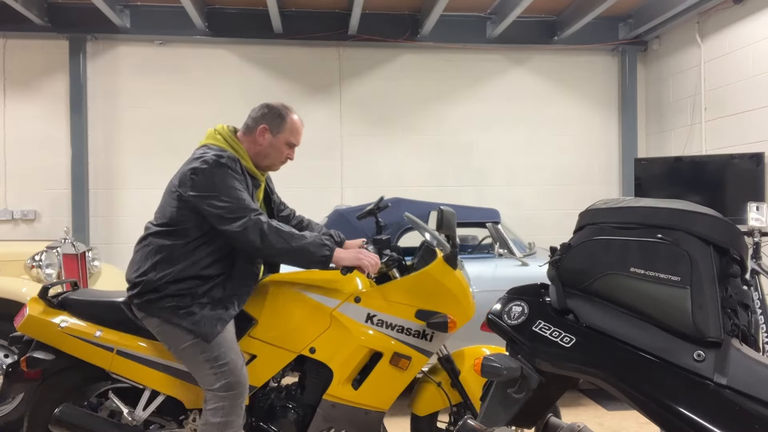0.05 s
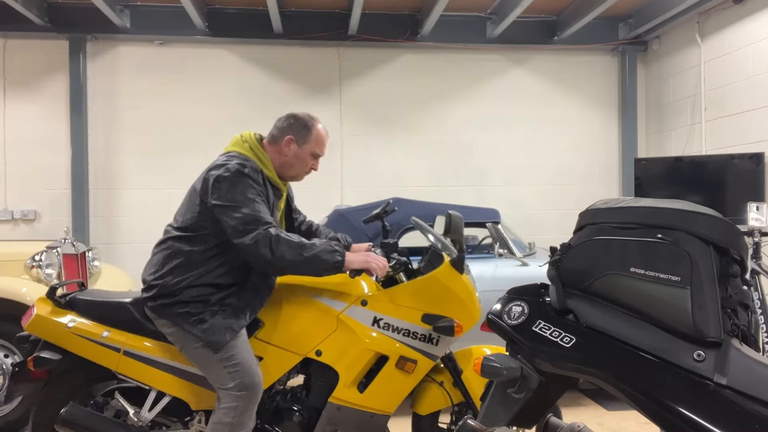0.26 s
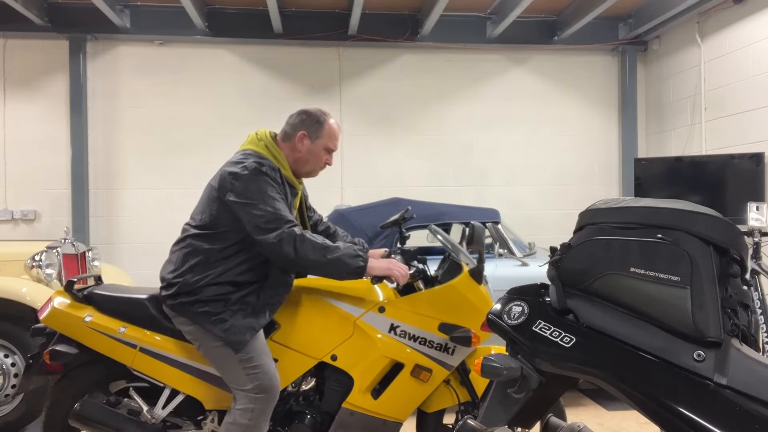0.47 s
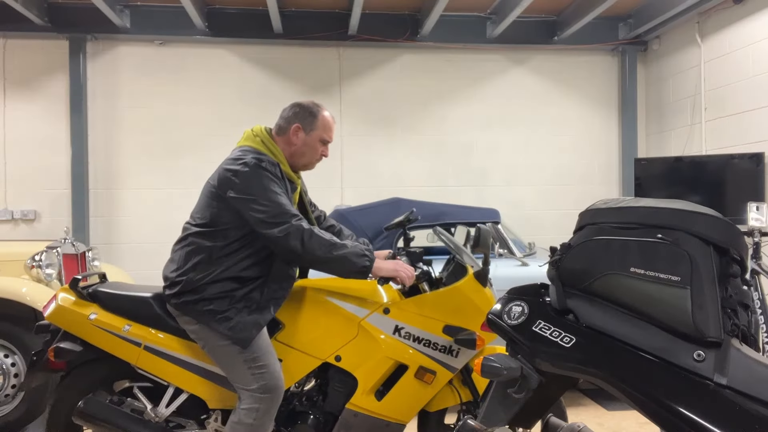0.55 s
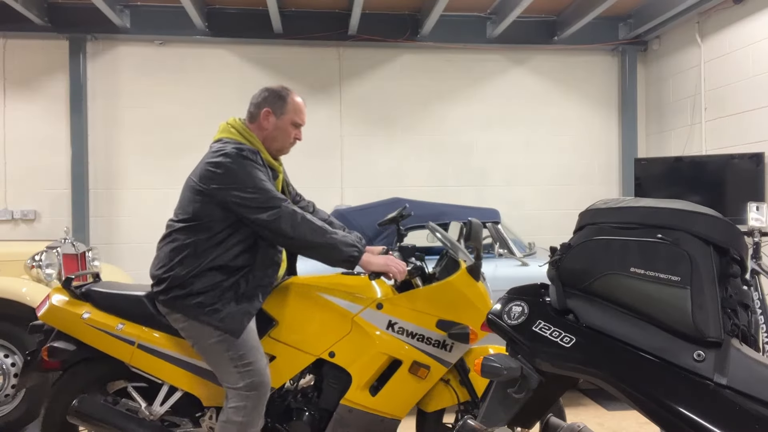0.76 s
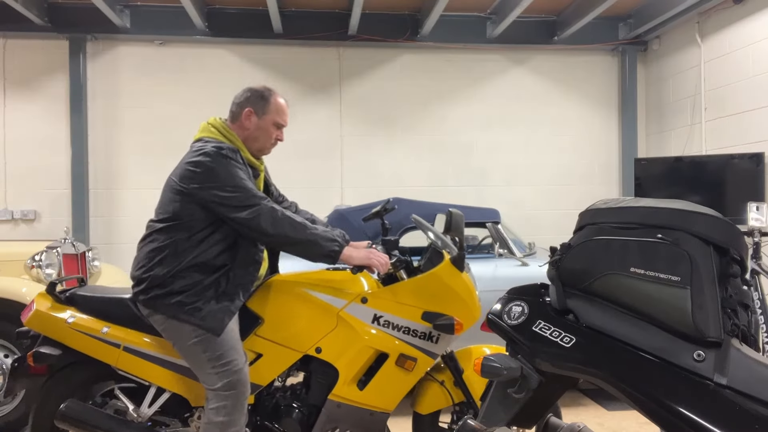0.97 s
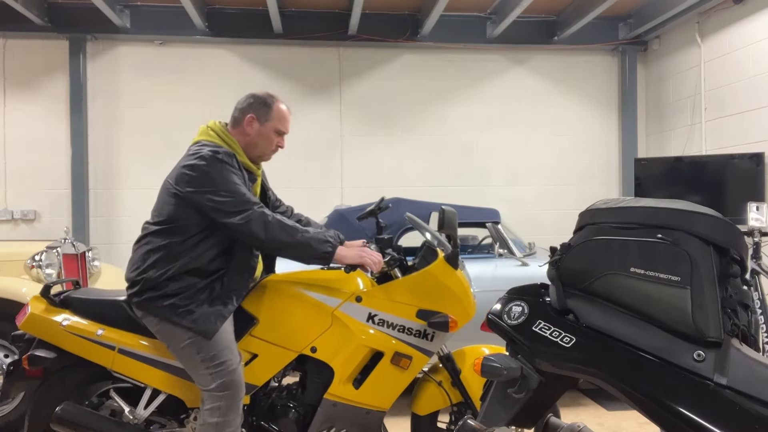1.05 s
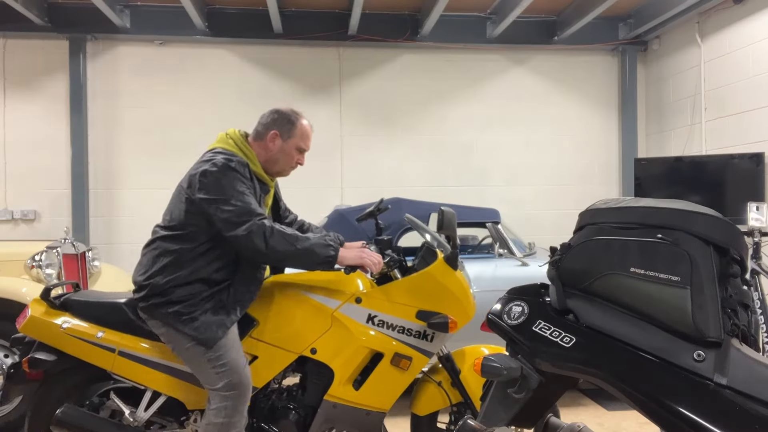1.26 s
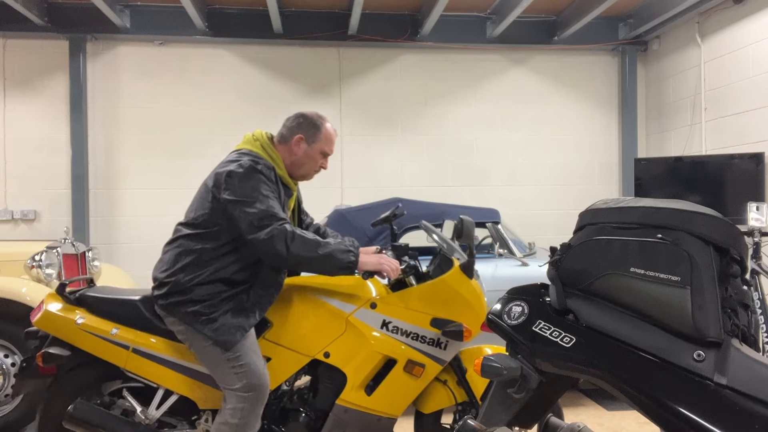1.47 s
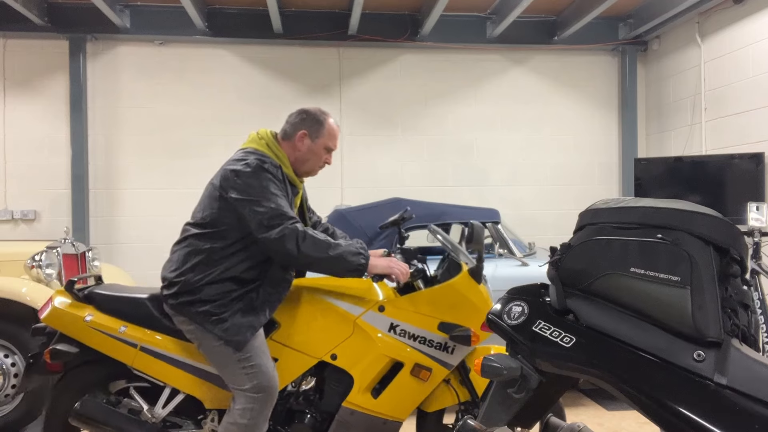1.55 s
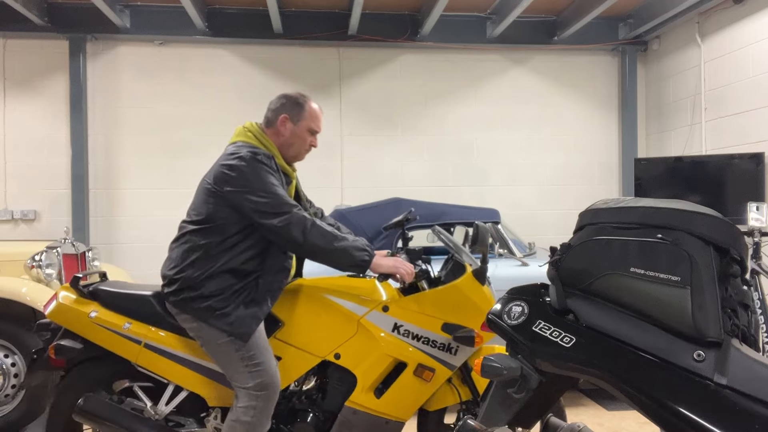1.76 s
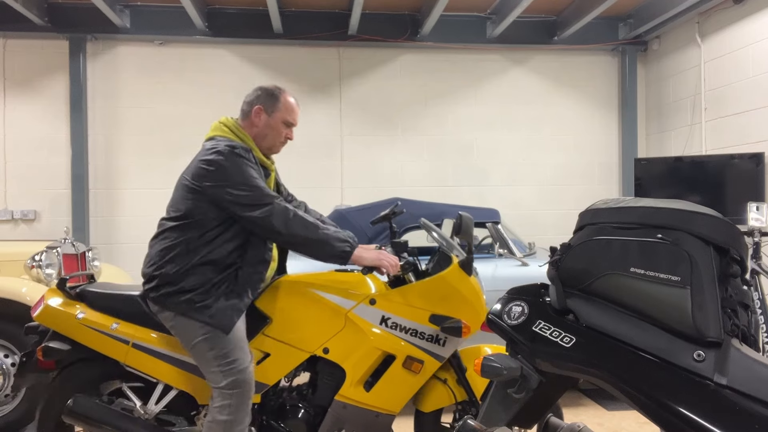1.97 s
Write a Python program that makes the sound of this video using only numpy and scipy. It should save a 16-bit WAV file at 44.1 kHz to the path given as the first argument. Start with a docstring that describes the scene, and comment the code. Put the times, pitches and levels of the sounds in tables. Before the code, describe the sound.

Fuel sloshing in a rocked motorcycle's hollow tank. Faint at first, then a sharp, bright knock with a low thud at 0.25 seconds. Seat scuffs and a crisp crease snap follow; rapid round glugs cluster around 0.45-0.6 with nylon swishing to 0.9. A near-quiet lull, a softer dull knock at 1.34, then gentler gurgles and brief rustle at 1.5-1.8, fading in a short garage echo.

```python
"""In a garage, a rider in a nylon jacket rocks a parked motorcycle to and fro.
The jacket swishes and cloth scuffs on the seat: both are random clicks shaped into coloured noise.
Creases snap as short noise bursts, and taut folds whistle as narrow bands of noise.
Fuel gurgles in the hollow tank: random laps ring its air, and single glugs are rising tones.
A loose part knocks twice and the weight thuds into the suspension, both as dying tones."""
import sys
import numpy as np
from scipy import signal
from scipy.io import wavfile

SR = 44100
rng = np.random.default_rng(int(sys.argv[2]) if len(sys.argv) > 2 else 0)


def generate_wav(sig):
    """Save sig (samples, or channels by samples) to the path in sys.argv[1] as 16-bit PCM at SR."""
    pcm = np.round(np.clip(np.atleast_2d(sig).T, -1, 1) * 32767).astype(np.int16)
    wavfile.write(sys.argv[1], SR, pcm)


def gain_from_decibels(decibels):
    """Convert decibel values to linear amplitude factors."""
    exponent = np.asarray(decibels, float) / 20
    return 10 ** exponent


N = 88200
TIME = np.arange(N) / SR   # s

# still air, relative spectrum: pitch_hz, level_db
AIR_SPECTRUM = [(35, -48.5), (60, -12), (367, 6), (846, -21.5), (1070, -8.5), (1550, -16), (1860, -12),
                (2240, -27.5), (3830, -18.5), (4500, -31), (8620, -21.5), (15400, -36.5)]
AIR_DB = -76.5

# garage reflections
ROOM_T60_S, ROOM_DB, WALL_CUT_HZ = 0.22, -17.5, 2500

# thuds into the suspension: start_s, level_db (before THUD_DB)
THUDS = [(.251, -24), (0.328, -30.5), (0.722, -48), (0.834, -30.5), (1.348, -25), (1.822, -40)]
# ringing tones of the frame: pitch_hz, level_db (relative), t60_s
FRAME_TONES = [(66.7, -2, 0.33), (97.2, 7, 0.067), (46, -19, 0.16)]
THUD_DB, THUD_RISE_S = -19.5, 0.008

# knocks of the loose part: start_s, tick_db, body_db, body_time_scale (a factor), side_tones_db
KNOCKS = [(0.2491, -20, -17, 0.24, -1.7), (1.337, -45.5, -24.5, 0.59, -9)]
# bright tick of a knock: pitch_hz, level_db (relative), t60_s
TICK_TONES = [(1088, -6, 0.023), (3170, -8, 0.0086), (4470, -13, .01), (6600, 0, .012), (7380, -11, 0.028),
              (8450, -43.5, .01), (12240, -22, 0.017)]
# hollow body of a knock: pitch_hz, level_db (relative), t60_s (before body_time_scale)
BODY_TONES = [(372, -1.5, 0.18), (310, -14.5, 0.16), (250, -2.5, 0.054), (165, -20, 0.24),
              (720, -10.5, 0.059), (1090, -8.5, 0.054)]
SIDE_TICK_HZ = 8200   # tick tones above this also take side_tones_db
BODY_LAG_S, BODY_RISE_S = 0.0024, 0.0018   # the rise is before body_time_scale
CRACK_DB, CRACK_T60_S = -12.5, 0.024

# sparse crinkles mixed into the slips of jacket and seat
CRINKLES_PER_S, CRINKLE_SPREAD_DB, CRINKLE_DB = 300, 3.5, -10.0

# cloth scuffing on the seat: start_s, level_db (before SCUFF_DB)
SCUFF = [(0.0, -60.5), (0.034, -71.5), (0.162, -54), (0.188, -44), (0.238, -50.5), (0.27, -46.5),
         (0.304, -36), (0.354, -54.5), (0.384, -48), (0.51, -58.5), (0.524, -51.5), (0.554, -55.5),
         (0.58, -47.5), (0.728, -53.5), (0.81, -48), (0.974, -67), (1.088, -55.5), (1.294, -85),
         (1.325, -72.5), (1.36, -55.5), (1.368, -65), (1.5, -79.5), (1.522, -106), (1.562, -83.5),
         (1.632, -73), (1.662, -55), (1.702, -51), (1.73, -70), (1.79, -73), (1.862, -102), (1.97, -89.5),
         (2.0, -90)]
# colour of the scuff, relative spectrum: pitch_hz, level_db
SEAT_SPECTRUM = [(290, -41.5), (500, -6), (593, -12.5), (809, -13.5), (1030, -13), (1180, -10),
                 (1680, -15.5), (1840, -10), (2370, -15.5), (3870, -21.5), (4970, -42.5), (5500, -40.5),
                 (7150, -49), (12100, -120)]
# narrow resonances of the rubbed panels: pitch_hz, width_hz, level_db (relative to the scuff)
PANELS = [(1043, 47, -9), (1334, 210, -20), (1776, 27, -16.5), (2170, 72, -27.5), (2804, 90, -18),
          (3340, 100, -29.5), (4600, 120, -17), (8150, 200, -32)]
SEAT_GRAINS_PER_S, SEAT_GRAIN_SPREAD_DB, SCUFF_DB = 4000, 2.5, -2.5
RUMBLE_DB, RUMBLE_TOP_HZ = -24.5, 150   # level relative to the scuff

# sharp folds snapping: start_s, level_db (before SNAP_DB and the band filter)
SNAPS = [(0.2902, -18), (0.3014, -31), (0.4603, -30), (0.5437, -41), (0.808, -26), (1.3948, -40.5)]
SNAP_T60_S, SNAP_DB, SNAP_LOW_HZ, SNAP_HIGH_HZ = 0.0061, -13.5, 900, 8000

# nylon sliding on nylon: start_s, level_db, sheen_db (finest slips, relative to level_db)
SWISH = [(0.0, -77.5, -35), (0.08, -70.5, -22), (0.108, -63, -38), (0.196, -57.5, -9), (0.238, -76, 9),
         (0.268, -54.5, -3), (0.29, -57, 3), (0.326, -54.5, -5), (0.356, -64.5, -4.5), (0.426, -55.5, -5),
         (0.508, -52.5, -6.5), (0.538, -57, 8), (0.544, -44.5, -9), (0.608, -54.5, -1), (0.722, -62, -11),
         (0.812, -51, -5), (0.822, -59, -1), (0.906, -65, -11), (1.046, -72, -27), (1.068, -66, -31),
         (1.15, -73.5, -11), (1.272, -100.5, -17), (1.325, -87, -13), (1.348, -67, -34),
         (1.406, -75.5, -10), (1.52, -103, 13), (1.572, -89, 1), (1.62, -53, -3.5), (1.658, -57.5, 1),
         (1.89, -103, -1.5), (1.994, -103, 0.5), (2.0, -104, -17)]
# colour of the nylon, relative spectrum: pitch_hz, level_db
NYLON_SPECTRUM = [(1710, -39.5), (2900, -2.5), (3080, -7.5), (3360, 2.5), (3800, 7.5), (4710, 1.5),
                  (5030, -27.5), (5430, 1), (6590, 4), (7150, 4), (7750, -4), (9030, -8.5), (9800, -34),
                  (12700, -39.5), (21600, -120)]
# colour of the finest slips, relative spectrum: pitch_hz, level_db
SHEEN_SPECTRUM = [(5290, -17.5), (9000, -9), (9850, -18.5), (11900, -13), (12900, -4), (13800, -16),
                  (14700, -10.5), (15400, -6.5)]
NYLON_GRAINS_PER_S, NYLON_GRAIN_SPREAD_DB = 9000, 2.5
# short whistles of a taut fold: start_s, level_db (before WHISTLE_DB), pitch_hz, rise_s
WHISTLES = [(0.108, -45.5, 4600, 0.0076), (0.413, -36, 2750, 0.0077), (.543, -30, 7210, 0.0032),
            (.565, -34, 6600, 0.0083), (0.805, -40.5, 5200, 0.0077), (1.393, -52, 3700, 0.0041),
            (1.606, -46.5, 3930, 0.015), (1.619, -39, 3830, 0.0035), (1.61, -48.5, 7100, 0.023)]
WHISTLE_WIDTH_HZ, WHISTLE_DB = 180, -14

# fuel moving in the tank: start_s, level_db (before SLOSH_DB), cavity_pitch_hz
SLOSH = [(0.0, -54.5, 460), (0.148, -54, 454), (0.19, -43.5, 437), (0.23, -45, 470), (0.238, -51.5, 463),
         (0.285, -41.5, 473), (0.363, -43, 384), (0.403, -35, 364), (0.501, -57, 440), (0.583, -39.5, 350),
         (0.605, -48.5, 344), (0.695, -46, 363), (0.751, -56.5, 400), (0.855, -44.5, 387),
         (1.003, -69, 466), (1.049, -52.5, 370), (1.107, -66.5, 400), (1.177, -62.5, 420),
         (1.243, -72, 352.6), (1.315, -99.5, 325), (1.325, -69, 344), (1.39, -56, 357), (1.408, -69, 357),
         (1.428, -50.5, 354), (1.466, -53, 355), (1.584, -45, 361), (1.65, -46.5, 359), (1.718, -41, 367),
         (1.77, -49.5, 375), (1.798, -45, 352), (1.848, -70, 353), (1.882, -69.5, 465), (1.894, -85, 468),
         (1.928, -79, 348), (1.974, -50, 369), (2.0, -54, 369)]
# fixed side resonances of the tank: pitch_hz, width_hz (of one pass), level_db (relative to the cavity)
TANK = [(310, 78.5, -5.5), (524.6, 24, -12), (692.7, 66, -18), (185, 40, -20)]
LAPS_PER_S, LAP_SPREAD_DB, CAVITY_WIDTH_HZ, SLOSH_DB = 260, 1, 111, -2.0
# single glugs: start_s, level_db (before GLUG_DB), starting_pitch_hz, t60_s
GLUGS = [(0.438, -24, 367.6, 0.075), (.469, -15, 474, 0.038), (.482, -25.5, 360, 0.11),
         (.494, -20, 448, 0.06), (.502, -20, 493, 0.049), (.512, -24, 358.5, 0.078),
         (.519, -33.5, 636, 0.059), (.537, -21, 372, 0.045), (.604, -27.5, 349, 0.1),
         (0.64, -31, 349.4, 0.12), (.678, -32.5, 422, 0.059), (.794, -40, 328, 0.1), (.84, -35, 365, 0.095),
         (0.872, -29, 387, 0.047), (1.033, -46, 395, .05), (1.423, -49, 359, 0.078),
         (1.528, -33, 364.6, 0.16), (1.562, -25.5, 423, 0.059), (1.574, -22, 346, 0.082),
         (1.594, -27.5, 355, 0.088), (1.698, -31.5, 390, 0.049), (1.735, -36, 356, 0.069),
         (1.789, -37, 338, 0.05), (1.946, -55.5, 310, .06), (1.972, -37.5, 347, 0.053)]
GLUG_RISE_S, GLUG_DB = 0.0021, -1.5
GLUG_CLIMB = 1.3   # the phase runs ahead by this share per second
TANK_LOW_HZ = 240

MIC_LOW_HZ, MIC_TOP_HZ = 46, 15700


def rms_one(x):
    """Scale a sound to an average strength (rms) of 1."""
    return x / np.sqrt(np.mean(x ** 2) + 1e-20)


def in_time(rows):
    """Draw straight lines between the rows of a table, giving each column one value a sample."""
    s, *columns = np.transpose(rows)
    return [np.interp(TIME, s, c) for c in columns]


def drift(rate_hz):
    """Slow random wandering with spread 1, made at every 40th sample and joined by lines."""
    r = np.exp(-80 * np.pi * rate_hz / SR)
    noise = rng.standard_normal(N // 40 + 2002)
    slow = signal.lfilter([1], [1, -2 * r, r * r], noise)[2000:]   # skip the filter's start
    return np.interp(np.arange(N) / 40, np.arange(len(slow)), rms_one(slow))


def since(start_s):
    """Seconds since a start, held at 0 before it."""
    return np.maximum(TIME - start_s, 0)


def ring(start_s, db, hz, t60):
    """A struck object's tone: a sine that loses 60 dB in t60 seconds."""
    t = since(start_s)
    return gain_from_decibels(db - 60 * t / t60) * np.sin(2 * np.pi * hz * t)


def resonance(x, hz, width_hz):
    """A hollow or panel that favours one pitch: two poles, with gain 1 at the top."""
    r = np.exp(-np.pi * width_hz / SR)
    poles = [1, -2 * r * np.cos(2 * np.pi * hz / SR), r * r]
    return signal.lfilter(np.array([1, 0, -1]) * (1 - r * r) / 2, poles, x)


def grains(per_s, spread_db):
    """Tiny contacts: random clicks of uneven size and sign."""
    hits = rng.random(N) < per_s / SR
    sizes = gain_from_decibels(spread_db * np.minimum(rng.exponential(1, N), 5))
    return hits * sizes * rng.choice([-1, 1], N)


def bursts(events, t60):
    """Noise that starts at once and dies away, at each (start_s, level_db)."""
    level = sum((TIME >= s) * gain_from_decibels(db - 60 * since(s) / t60) for s, db in events)
    return rng.standard_normal(N) * level


def cloth_slips(per_s, spread_db):
    """Two sources of dense slips of the weave, sharing the same sparse crinkles."""
    crinkles = gain_from_decibels(CRINKLE_DB) * rms_one(grains(CRINKLES_PER_S, CRINKLE_SPREAD_DB))
    return [rms_one(grains(per_s, spread_db)) + crinkles for _ in range(2)]


def coloured(sources, spectrum, patchy_db):
    """Sixth-octave bands taken in turn from two sources, each with its level and flicker; rms 1."""
    hz_points, db_points = np.transpose(spectrum)
    edges = 25 * 2 ** (np.arange(57) / 6)
    out, together = 0, drift(17)
    for k, (low, high) in enumerate(zip(edges, edges[1:])):
        middle = np.log(low * high) / 2
        level = np.interp(middle, np.log(hz_points), db_points, left=-200, right=-200)
        sos = signal.butter(2, [low, high], "band", fs=SR, output="sos")
        band = signal.sosfilt(sos, sources[k % 2])
        flicker = patchy_db * (0.71 * together + drift(5.04))
        out = out + gain_from_decibels(level + flicker) * band
    return rms_one(out)


def still_air():
    """Faint steady noise of the air, coloured band by band."""
    return gain_from_decibels(AIR_DB) * coloured(rng.standard_normal((2, N)), AIR_SPECTRUM, patchy_db=0.7)


def garage(x):
    """Reflections off the walls: eight feedback delays, duller on every round."""
    out, dull = np.zeros(N), np.exp(-2 * np.pi * WALL_CUT_HZ / SR)
    lags = (np.geomspace(0.013, 0.041, 8) * SR).astype(int)   # delays in samples
    for k, lag in enumerate(lags):
        loop, state = x.copy(), [0.]
        gain = gain_from_decibels(-60 * lag / SR / ROOM_T60_S)
        for i in range(lag, N, lag):
            back, state = signal.lfilter([gain * (1 - dull)], [1, -dull], loop[i - lag:i], zi=state)
            loop[i:i + lag] += back[:N - i]
        out += (loop - x) * (-1) ** k   # reflections only, with alternating sign
    return out


def thuds():
    """Each shift of weight into the suspension makes low frame tones swell and die."""
    out = 0
    for s, db in THUDS:
        swell = 1 - np.exp(-since(s) / THUD_RISE_S)
        for hz, tone_db, t60 in FRAME_TONES:
            out = out + swell * ring(s, db + tone_db + THUD_DB, hz, t60)
    return out


def knocks():
    """A bright tick with a rough crack, then the hollow body swells to a softer contact."""
    tick, body = 0, 0
    for s, tick_db, body_db, scale, side_db in KNOCKS:
        for hz, db, t60 in TICK_TONES:
            tick = tick + ring(s, tick_db + db + side_db * (hz > SIDE_TICK_HZ), hz, t60)
        body_start = s + BODY_LAG_S
        swell = 1 - np.exp(-since(body_start) / (BODY_RISE_S * scale))
        for m, (hz, db, t60) in enumerate(BODY_TONES):
            tone_db = body_db + db + side_db * (m > 0)   # the first tone is the main one
            body = body + swell * ring(body_start, tone_db, hz, t60 * scale)
    rough = bursts([(s, db + CRACK_DB + 12) for s, db, *_ in KNOCKS], CRACK_T60_S)
    crack = sum(gain_from_decibels(db) * resonance(rough, hz, 550.0) for hz, db, _ in TICK_TONES)
    return tick + crack + body


def seat():
    """Coarser slips on the seat cover ring the panels, with a low rumble through the frame."""
    slips = cloth_slips(SEAT_GRAINS_PER_S, SEAT_GRAIN_SPREAD_DB)
    panels = 0
    for hz, width_hz, db in PANELS:
        panels = panels + gain_from_decibels(db + 1.1 * drift(10)) * rms_one(resonance(slips[0], hz, width_hz))
    low_band = signal.butter(2, [40, RUMBLE_TOP_HZ], "band", fs=SR, output="sos")
    low = signal.sosfilt(low_band, rng.standard_normal(N))
    rumble = gain_from_decibels(RUMBLE_DB + 4.5 * drift(10)) * rms_one(low)
    scuff = coloured(slips, SEAT_SPECTRUM, patchy_db=3.78)
    return gain_from_decibels(in_time(SCUFF)[0] + SCUFF_DB) * (scuff + panels + rumble)


def folds():
    """Stiff creases of the jacket snap over: short bursts of noise in a middle band."""
    band = signal.butter(2, [SNAP_LOW_HZ, SNAP_HIGH_HZ], "band", fs=SR, output="sos")
    return gain_from_decibels(SNAP_DB) * signal.sosfilt(band, bursts(SNAPS, SNAP_T60_S))


def whistles():
    """A taut fold whistles briefly: narrow noise that rises and falls."""
    out = 0
    for s, db, hz, rise_s in WHISTLES:
        u = since(s) / rise_s
        swell = u * np.exp(1 - u)   # reaches 1 after rise_s
        tone = rms_one(resonance(rng.standard_normal(N), hz, WHISTLE_WIDTH_HZ))
        out = out + gain_from_decibels(db + WHISTLE_DB) * swell * tone
    return out


def jacket():
    """Dense slips of the weave under the stroke, with sparse crinkles and a changing sheen."""
    level_db, sheen_db = in_time(SWISH)
    slips = cloth_slips(NYLON_GRAINS_PER_S, NYLON_GRAIN_SPREAD_DB)
    sheen = coloured(slips, SHEEN_SPECTRUM, patchy_db=1.0)
    nylon = coloured(slips, NYLON_SPECTRUM, patchy_db=2.8)
    return gain_from_decibels(level_db) * (nylon + gain_from_decibels(sheen_db) * sheen)


def slosh():
    """Soft laps ring the air cavity, whose pitch shifts with the fuel, and the fixed tank resonances."""
    level_db, cavity_hz = in_time(SLOSH)
    laps = grains(LAPS_PER_S, LAP_SPREAD_DB)
    r = np.exp(-np.pi * CAVITY_WIDTH_HZ / SR)
    # shift the cavity pitch down to zero, smooth there, then shift back up
    turn = np.exp(2j * np.pi * np.cumsum(cavity_hz) / SR)
    smooth = signal.lfilter([1], [1, -2 * r, r * r], laps / turn)
    cavity = rms_one((smooth * turn).real)
    sides = 0
    for hz, width_hz, db in TANK:
        once = resonance(grains(LAPS_PER_S, LAP_SPREAD_DB), hz, width_hz)
        sides = sides + gain_from_decibels(db) * rms_one(resonance(once, hz, width_hz))
    return gain_from_decibels(level_db + SLOSH_DB) * rms_one(cavity + sides)


def glugs():
    """Each glug is a softly started tone that climbs in pitch as it dies."""
    out = 0
    for s, db, hz, t60 in GLUGS:
        t = since(s)
        level = gain_from_decibels(db + GLUG_DB - 60 * t / t60) * (1 - np.exp(-t / GLUG_RISE_S)) ** 2
        out = out + level * np.sin(2 * np.pi * hz * t * (1 + GLUG_CLIMB * t))
    return out


def fuel():
    """Laps and glugs in the hollow tank, with the bass taken off."""
    low_cut = signal.butter(3, TANK_LOW_HZ, "high", fs=SR, output="sos")
    return signal.sosfilt(low_cut, slosh() + glugs())


def scene():
    """All sources, their reflections and the still air."""
    near = thuds() + knocks() + seat() + folds() + whistles() + jacket() + fuel()
    return (near + gain_from_decibels(ROOM_DB) * garage(near) + still_air())[None]


def band_limit(x):
    """A steep low-pass at the top of the band."""
    return signal.sosfilt(signal.butter(12, 15550, fs=SR, output="sos"), x)


def record(dry):
    """The microphone drops the deepest bass and the very top."""
    low_cut = signal.butter(2, MIC_LOW_HZ, "high", fs=SR, output="sos")
    top_cut = signal.cheby2(10, 50, MIC_TOP_HZ, fs=SR, output="sos")
    mix = signal.sosfilt(np.vstack([low_cut, top_cut]), dry)
    return band_limit(mix)


dry = scene()
out = record(dry)
generate_wav(out)
```